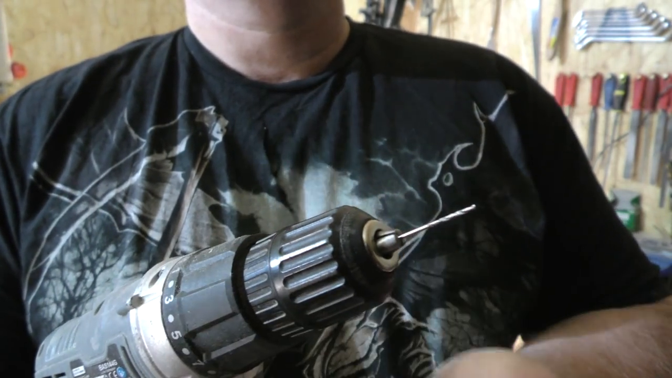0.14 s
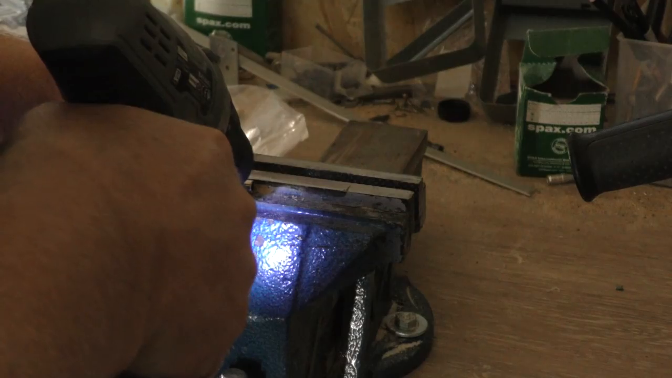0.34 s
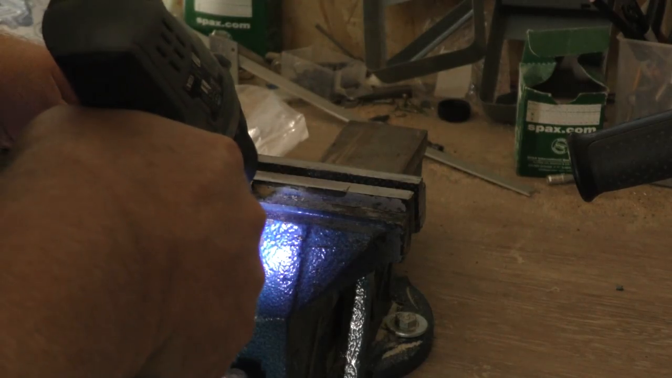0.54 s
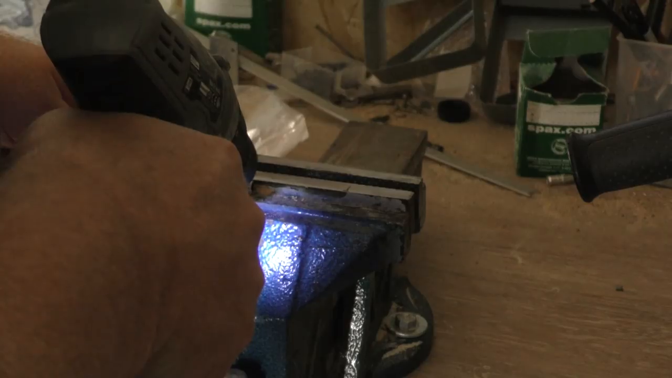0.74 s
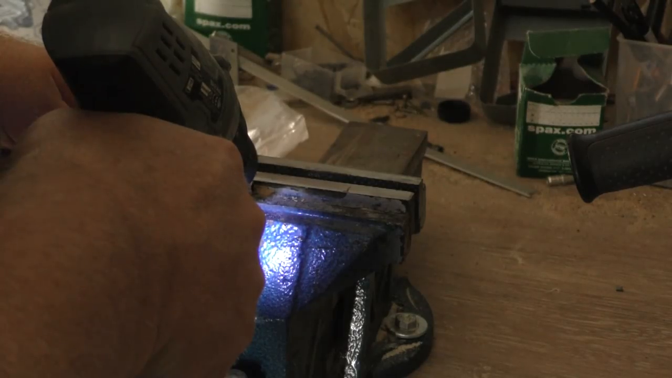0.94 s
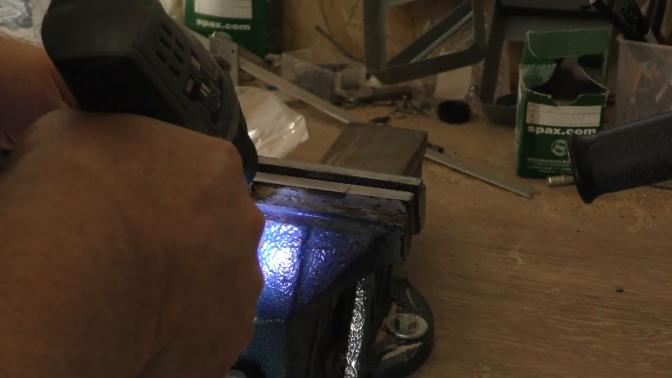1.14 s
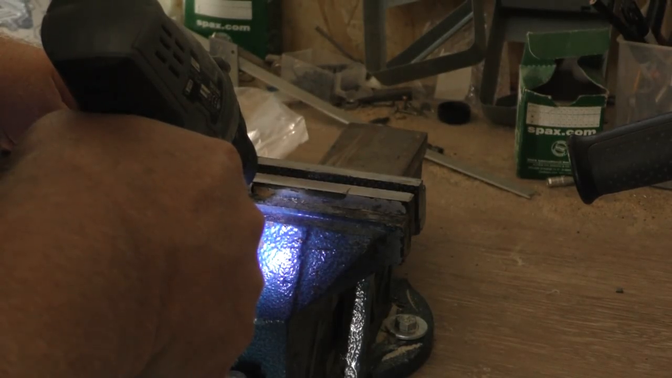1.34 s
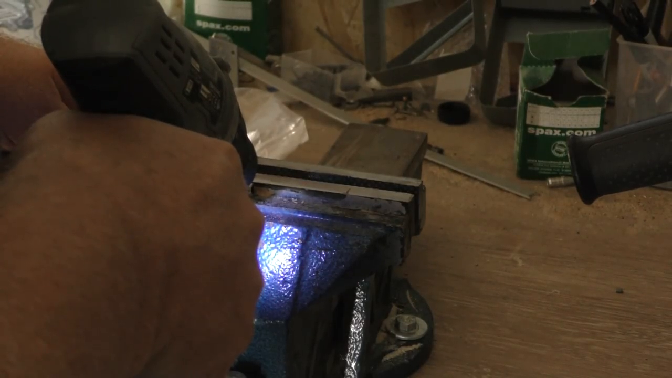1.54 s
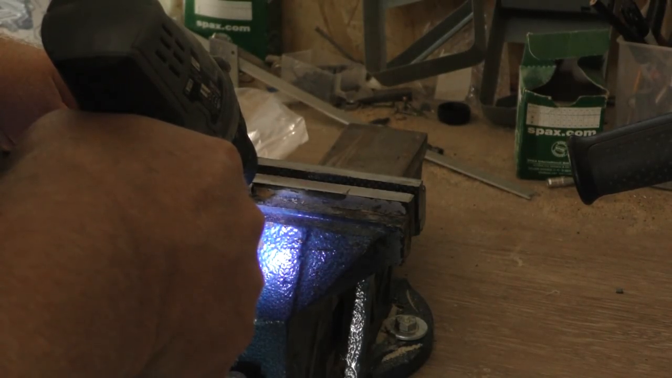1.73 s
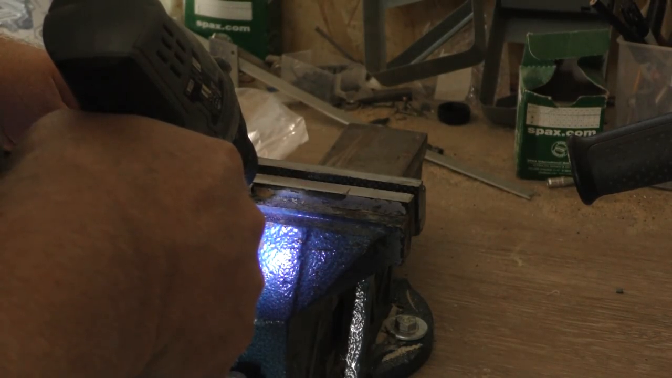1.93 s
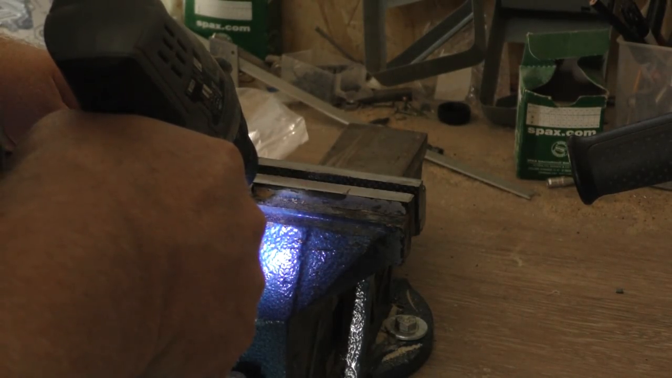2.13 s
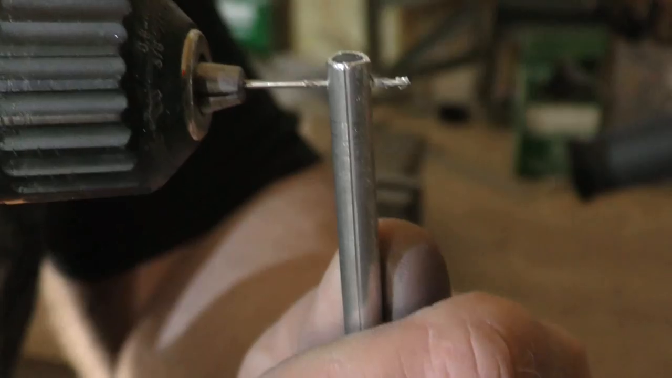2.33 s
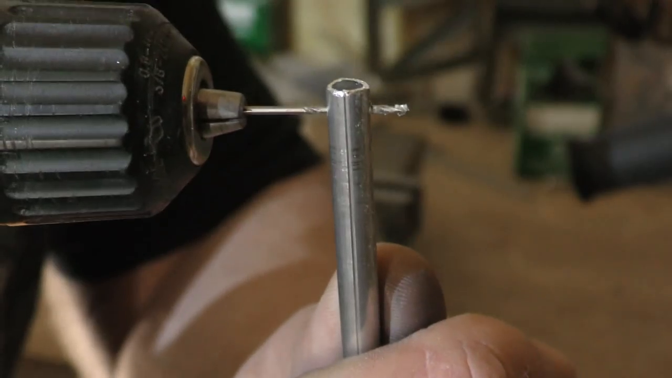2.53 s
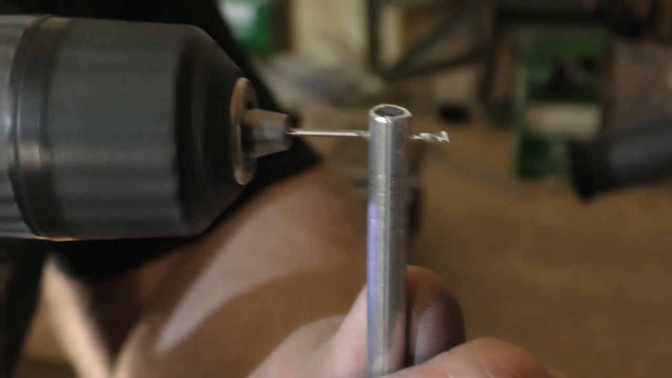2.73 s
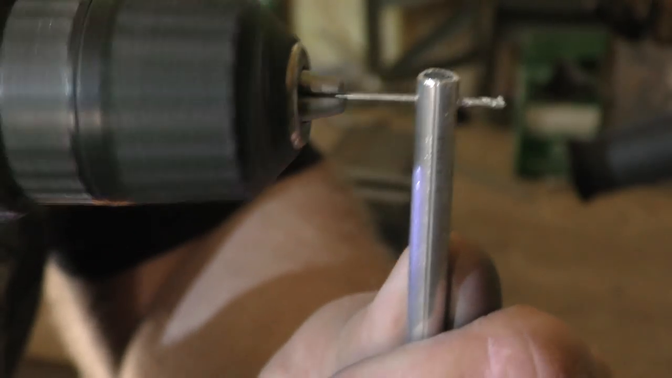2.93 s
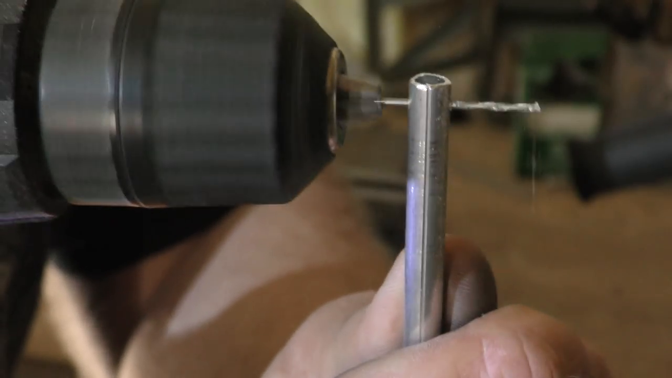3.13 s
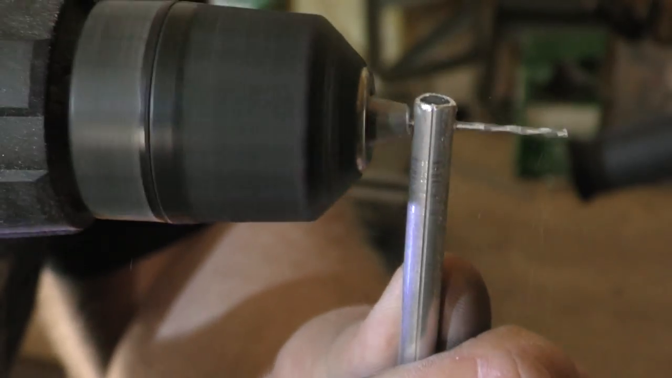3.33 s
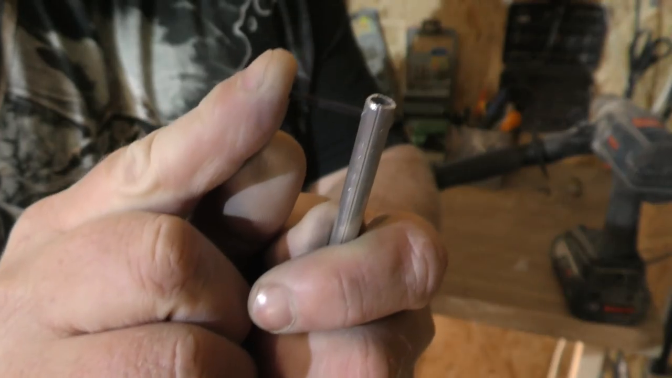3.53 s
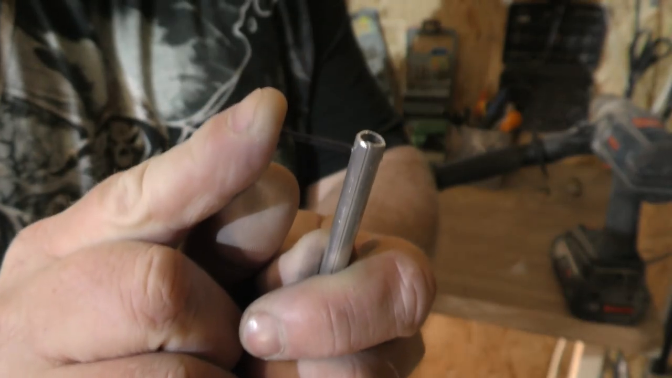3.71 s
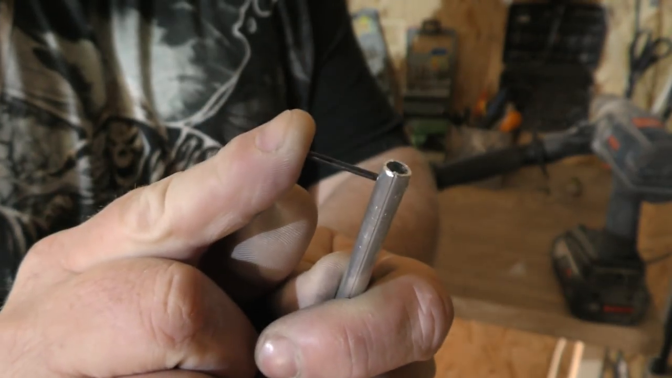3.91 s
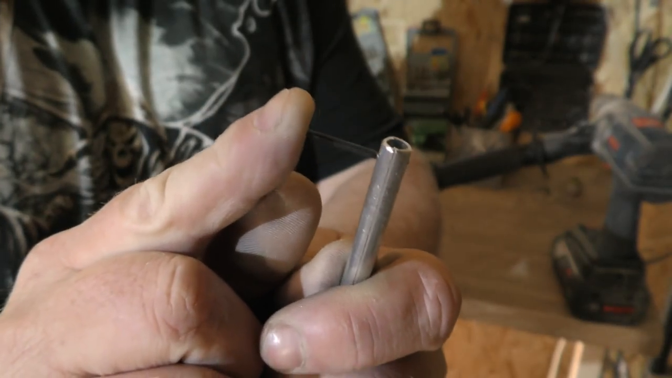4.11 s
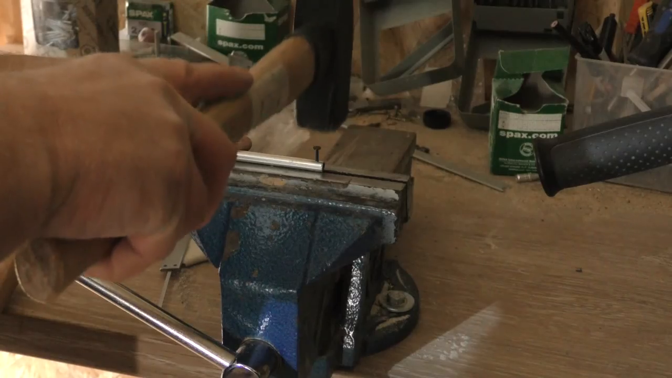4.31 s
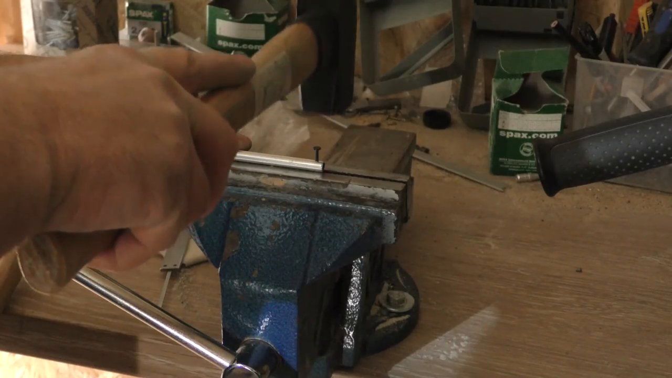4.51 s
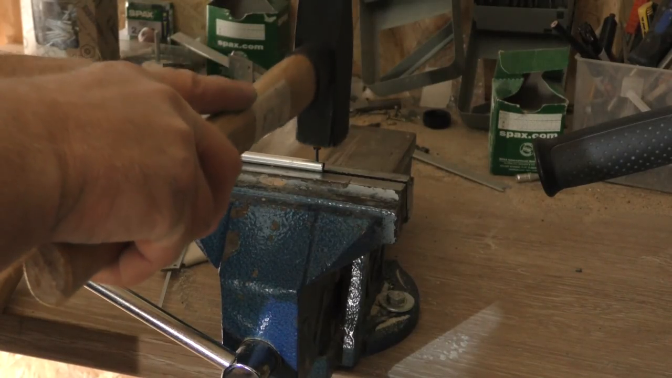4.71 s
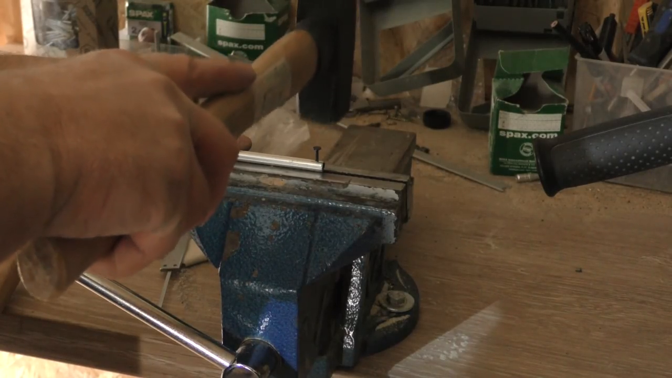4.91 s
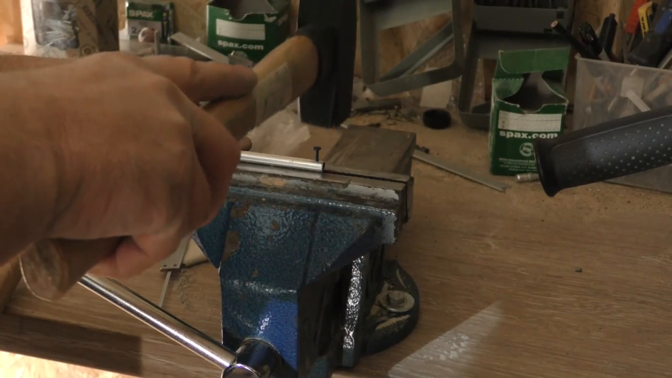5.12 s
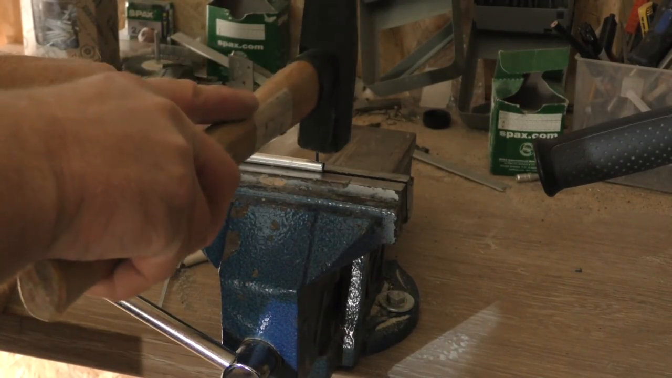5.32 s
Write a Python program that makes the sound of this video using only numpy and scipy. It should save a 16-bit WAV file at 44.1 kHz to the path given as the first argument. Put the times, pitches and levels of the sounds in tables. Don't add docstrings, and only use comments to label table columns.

```python
import sys
import numpy as np
from scipy import signal
from scipy.fft import rfft, irfft
from scipy.io import wavfile

SR = 44100
rng = np.random.default_rng(int(sys.argv[2]) if len(sys.argv) > 2 else 0)


def invert_db(x):
    u = np.asarray(x, float) / 20
    return 10 ** u


def dump_mix(stems):
    frames = np.atleast_2d(stems).T
    limited = np.clip(frames, -1, 1)
    pcm = np.round(limited * 32767).astype(np.int16)
    wavfile.write(sys.argv[1], SR, pcm)


N = 236331
TIME = np.arange(N) / SR
FFT_HZ = np.maximum(np.arange(N // 2 + 1) * SR / N, 1)
END_S = 6

SCENE_CHANGES = [
    0.3895,
    2.4087,
    3.4598,
    4.292,
]

# (air [dB], microphone hiss [dB], rumble [dB], air excess after the change [dB])
ROOM_LEVELS = [
    (-68, -67, -72.5, 3.5),
    (-61, -84, -84, 3),
    (-66.5, -94, -86.5, -16.5),
    (-70, -72.5, -71, 7),
    (-65, -69, -71.5, 1),
]
# (frequency [Hz], density [dB per Hz])
AIR_COLOUR = [(35, -30), (60, -16), (154, -13), (279, -10), (306, -11), (382, -4), (419, -10), (563, -8),
              (928, -14.5), (5000, -30.5), (6500, -47.5), (11000, -120)]
# (frequency [Hz], level [dB])
AIR_HUM = [(279.9, -78.5), (376.8, -99), (554.5, -80), (1949, -84), (2067, -86.5)]
# (frequency [Hz], level [dB])
CAMERA_WHINE = [(7957, -102), (11999, -94)]
# (frequency [Hz], side over mid [dB])
AIR_SIDE = [(60, -6), (110, -9), (200, -18), (360, -18), (660, -8.5), (1200, -2), (2180, -1.5), (3980, 3),
            (7240, 3), (13200, 1)]
# (frequency [Hz], density [dB per Hz])
FADING = [(120, -43), (200, -15), (338, -1), (402, -15), (479, -6), (560, -22), (754, -5), (1810, 5),
          (13000, -26)]
FADING_DB, FADING_T60_S = -61.5, 0.6
# (start [s], end [s], hiss lift [dB])
RUSTLES = [
    (2.56, 2.624, 12),
    (4.22, 4.292, 6.5),
]
SETTLE_S = 0.37

# (start [s], end [s], start pitch [Hz], end pitch [Hz], level [dB])
SQUEAKS = [
    (2.804, 2.875, 4980, 5330, -45),
    (3.54, 3.62, 4720, 4700, -79),
    (4.31, 4.345, 10450, 10750, -79),
    (4.345, 4.41, 10400, 10250, -84),
    (4.62, 4.72, 9800, 8800, -82),
]

# (time [s], peak [dB], bench thump [dB], vice clang [dB], crack [dB])
BLOWS = [
    (4.293, -20.5, -19.5, -19.5, -24),
    (4.423, -3, -17.5, -14.5, -13.5),
    (4.748, -3, -23, -14, -21.5),
    (5.047, -3, -18.5, -11.5, -16),
    (5.328, -6, -14.5, -11, -12.5),
]
# (frequency [Hz], level [dB], decay T60 [s])
KNOCK = [(93.6, -9.5, 0.3), (203.3, -4.5, 0.44), (379.4, -2.5, 0.13), (423, -3, 0.15), (508, -8, 0.13),
         (590, -22, 0.12), (763, -10, 0.064), (880, -3, 0.18), (1300, -37, .06), (1491, 1.5, 0.086),
         (1910, -10.5, 0.46), (2260, -11, 0.61), (2330, -7.5, 0.3), (2690, 2, 0.063)]
# (frequency [Hz], level [dB], decay T60 [s])
VICE = [(371, -10, 0.83), (425, -1, 0.52), (484, -4, 0.42), (829, -9, 0.45), (931, -5, 0.26),
        (1028, -5, 0.28), (1303, -7, 0.43), (1405, -11, 0.49), (1814, -8, 0.22), (1911, -9, 0.48),
        (2164, -10, 0.51), (2229, -16, 0.9), (2299, -5, 0.29), (3510, -16, 0.32)]
# (frequency [Hz], density [dB per Hz])
CRACK = [(35, -54), (60, -91), (262, -8), (423, 4.5), (622, -10.5), (1510, -3), (1690, -4.5), (2370, -12),
         (3340, -13), (7900, -19), (13600, -33.5)]
# (frequency [Hz], density [dB per Hz])
TAIL = [(24, -48), (40, -7.5), (200, -3), (268, -8.5), (494, -4.5), (1050, -15.5), (1160, -12),
        (1440, -12.5), (1700, -18), (2300, -11), (2790, -23), (5260, -21.5), (13600, -41)]
# (frequency [Hz], decay T60 [s])
TAIL_T60 = [(50, 1), (100, 0.25), (200, 0.49), (500, 0.46), (1500, 0.48), (4000, 0.41), (8000, 0.29),
            (13000, 0.18)]
# (frequency [Hz], side over mid [dB])
BLOW_SIDE = [(60, -27), (110, -36), (200, -47), (360, -38), (660, -25.5), (1200, -19), (2180, -9),
             (3980, -9), (7240, -3.5), (13200, 0.5)]
# (frequency [Hz], left over right [dB])
BLOW_LEAN = [(60, 0.46), (120, 3), (230, -1.8), (450, 1.2), (890, 0.36), (1740, -0.5), (3420, -0.5),
             (6720, -1), (13200, 1.9)]
KNOCK_DB, RING_DB = -10.5, -29.5
STALE_DB = -5
BOUNCE_S, BOUNCE_DB = .0074, -6
LEAD_S = 0.0031
SAME_PATH = .4

# (frequency [Hz], density [dB per Hz])
STEADY_WHIR = [(29, -59), (50, -58), (144, -24), (252, -16), (297, -24), (342, -18), (443, -9.5),
               (510, -13.5), (587, -1), (709, -5), (1030, -5), (1770, -3), (2350, -5), (9150, -11.5),
               (13600, -22.5)]
# (frequency [Hz], width [Hz], level [dB])
STEADY_CASING = [(150, 16, 2), (460, 92, 6), (573, 96, 4.5), (1030, 79, 8.5), (1523, 83, 7),
                 (1938, 206, 5.5), (4710, 380, 5), (5800, 850, 4), (9930, 440, 4), (11600, 130, -8.5),
                 (11740, 130, 7.5)]
# (order [turns], level [dB])
STRONG_ORDERS = [(.5, -71), (2, -53), (3, -57), (3.49, -55), (6, -54), (7.5, -60), (8.5, -62), (12, -56),
                 (12.5, -64), (19, -60), (24, -64), (26, -64), (30, -59), (42, -70), (43, -74), (44, -74)]
# (frequency [Hz], level [dB])
GEAR_TONES = [(457.6, -63), (1583, -56), (1954, -58), (4011, -66), (4344, -66), (6665, -66)]
# (frequency [Hz], side over mid [dB])
STEADY_SIDE = [(60, -14), (110, -20), (200, -37), (360, -34), (660, -30), (1200, -28), (2180, -18.5),
               (3980, -12.5), (7240, -3), (13200, 1.5)]
# (frequency [Hz], left over right [dB])
STEADY_LEAN = [(60, 16), (120, 1), (230, -1), (450, 8), (890, -7), (1740, 0), (3420, 0.5), (6720, -3.5),
               (13200, 5)]
STEADY_TURNS_HZ, STEADY_DB = 297.6, -36.5
ORDER_DB, ORDER_FALL_DB, TOP_ORDERS_DB = -64.5, .15, -8

# (frequency [Hz], density [dB per Hz])
CLOSE_WHIR = [(29, -72), (50, -39), (122, -60), (182, -35), (247, -33), (297, -36), (367, -11), (726, -9.5),
              (816, -10), (1900, -10.5), (3410, -12), (4970, -7.5), (6280, -13.5), (10800, -18.5),
              (13600, -33)]
# (frequency [Hz], width [Hz], level [dB])
CLOSE_CASING = [(494, 170, 2.5), (700, 64, 7.5), (1050, 130, 4), (1520, 110, 5), (1884, 230, 10.5),
                (2230, 55, 5), (2730, 220, 6), (5070, 620, 2.5)]
# (time [s], turns [Hz])
ROTOR = [(2.72, 124.5), (2.83, 152.4), (2.89, 165.5), (3.0, 173.8), (3.19, 183.5), (3.355, 188.8),
         (3.375, 233), (3.403, 246.6), (3.461, 279.5)]
# (order [whine pitch], level [dB])
WHINE_ORDERS = [(1, 0), (2, -9), (3, -21)]
# (time [s], level [dB], frequency [Hz], decay T60 [s])
TRIGGER_CLICKS = [
    (2.602, -66, 5600, .003),
    (2.6165, -47, 1500, .012),
    (2.617, -48, 520, .03),
    (2.64, -48, 2600, .005),
    (2.651, -50, 1700, .03),
    (2.655, -41, 5200, .009),
]
# (order [turns], level at 180 turns [dB], rise per doubling of speed [dB])
CLOSE_ORDERS = [(1, -69.5, 32), (2, -72.5, 23), (3, -47.5, 10.5), (4, -46.5, 4), (6, -49.5, 8)]
# (frequency [Hz], width [Hz], level [dB])
TONE_PATH = [(516, 7.3, -4), (724, 27, 9), (787, 75, -12), (1030, 160, -13)]
# (order [turns], level [dB])
MESH = [(27, -47), (42, -59.5)]
# (frequency [Hz], side over mid [dB])
CLOSE_SIDE = [(60, 0), (110, -24), (200, -34), (360, -29), (660, -30), (1200, -24), (2180, -8.5),
              (3980, -15), (7240, 0), (13200, 6)]
# (frequency [Hz], left over right [dB])
CLOSE_LEAN = [(60, 8), (120, 0.0), (230, -1), (450, 0.5), (890, 7), (1740, 3.5), (3420, 3.5), (6720, 0.5),
              (13200, 4)]
PRESS_S, SPIN_S, FREE_S = 2.6165, 2.64, 3.36
CLOSE_DB, SPIN_GAP_DB, SPIN_UP_S = -42, 35, 0.037
JOLT_DB, JOLT_T60_S = -65, 0.12
FREE_RISE_DB_PER_S = 40
DULL_DB, DULL_UNTIL_S, DULL_RAMP_S = -10, 2.754, .08
RATTLE_PER_S, RATTLE_DB, RATTLE_UNTIL_S = 350, 13.5, 2.73
MESH_FROM_S, MESH_TO_S, MESH_GROWS_DB_PER_S = 2.99, 3.335, 13
WHINE_STALL_HZ, WHINE_SLIP_HZ, WHINE_RUN_HZ = 3780, 3630, 3515
WHINE_SAG_S, WHINE_DB = .015, -58.5
SNAG_WOBBLE, SNAG_S, SNAG_DB = .05, .07, 4


def rms_one(x):
    return x / np.sqrt(np.mean(x ** 2) + 1e-20)


def in_time(rows):
    s, *columns = np.transpose(rows)
    return [np.interp(TIME, s, c) for c in columns]


def at_hz(points, hz):
    table_hz, values = np.transpose(points)
    return np.interp(np.log(hz), np.log(table_hz), values)


def through(resonances, hz):
    return sum(db / (1 + (2 * (hz - centre_hz) / width_hz) ** 2) for centre_hz, width_hz, db in resonances)


def between(start, end, edge=.0008):
    return np.clip(np.minimum(TIME - start, end - TIME) / edge + .5, 0, 1)


def drift(rate):
    r = np.exp(-80 * np.pi * rate / SR)
    slow = signal.lfilter([1], [1, -2 * r, r * r], rng.standard_normal(N // 40 + 2002))[2000:]
    return np.interp(np.arange(N) / 40, np.arange(len(slow)), rms_one(slow))


def coloured(spectrum, resonances=()):
    level_db = at_hz(spectrum, FFT_HZ) + through(resonances, FFT_HZ)
    return rms_one(irfft(rfft(rng.standard_normal(N)) * invert_db(level_db), N))


def sine(hz):
    return np.sqrt(2) * np.sin(2 * np.pi * (np.cumsum(hz) / SR + rng.random()))


def ring(clicks, hz, t60):
    r, w = invert_db(-60 / (t60 * SR)), 2 * np.pi * hz / SR
    return signal.lfilter([0, np.sin(w)], [1, -2 * r * np.cos(w), r * r], clicks + 1e-18)


def highpass(x, order, hz):
    return signal.sosfilt(signal.butter(order, hz, "high", fs=SR, output="sos"), x)


def pair(x, side, lean, spread_s=0.017):
    scatter = rng.standard_normal(2000) * np.exp(-np.arange(2000) / (spread_s * SR))
    width = invert_db(at_hz(side, FFT_HZ))
    tilt = np.tanh(at_hz(lean, FFT_HZ) * np.log(10) / 20)
    in_step = np.clip(tilt * (1 + width ** 2) / (2 * width), -1, 1)
    apart = in_step + np.sqrt(1 - in_step ** 2) * rfft(scatter / np.linalg.norm(scatter), N)
    difference = irfft(rfft(x) * width * apart, N)
    return np.array([x + difference, x - difference])


def room_air():
    to_vice, to_close, to_room, _ = SCENE_CHANGES
    place = np.searchsorted(SCENE_CHANGES, TIME)
    air_db, hiss_db, rumble_db, excess_db = np.array(ROOM_LEVELS)[place].T
    since_change = TIME - np.array([0, *SCENE_CHANGES])[place]
    air_db = air_db + excess_db * np.exp(-since_change / SETTLE_S)
    rustle_db = sum(db * between(a, b, edge=0.047) for a, b, db in RUSTLES)
    hiss_db = hiss_db + rustle_db + 2.4 * drift(7.1)
    air = coloured(AIR_COLOUR) * invert_db(air_db + 0.37 * drift(6.4))
    air += coloured(FADING) * invert_db(FADING_DB - 60 * TIME / FADING_T60_S)
    hum = sum(invert_db(db + 1.28 * drift(7.4)) * sine(np.full(N, hz)) for hz, db in AIR_HUM)
    hum = hum * between(to_room, END_S)
    hiss = invert_db(hiss_db - 4.0) * np.array([coloured([(1500, -2.0), (5000, 2), (14000, -5.0)]) for ear in "LR"])
    rumble = np.array([coloured([(8, 1.0), (40, -13.5), (120, -40.5)]) for ear in "LR"])
    rumble = rumble * invert_db(rumble_db + 9.5)
    whine = sum(invert_db(db) * sine(np.full(N, hz)) for hz, db in CAMERA_WHINE)
    ducked = invert_db(-14 * between(to_vice, to_close) - 3.6 * between(3.1, to_room))
    wide_air = pair(air + hum, AIR_SIDE, [(1, 0.0043)], spread_s=0.023)
    return (wide_air + hiss + rumble * ducked ** .6) * ducked + whine


def squeaks():
    out = np.zeros(N)
    for start, end, from_hz, to_hz, db in SQUEAKS:
        glide_hz = np.interp(TIME, [start, end], [from_hz, to_hz])
        out += invert_db(db) * between(start, end, edge=.01) * sine(glide_hz)
    return out


def blow_db(hz, fresh=False):
    levels_db = []
    for _, peak_db, thump_db, clang_db, crack_db in BLOWS:
        balance = [(150, thump_db), (450, KNOCK_DB), (1700, clang_db), (6000, crack_db)]
        levels_db.append(peak_db + at_hz(balance, hz))
    levels_db = np.array(levels_db)
    levels_db[0] += STALE_DB * fresh
    return levels_db


def after_blows(levels_db, t60, rise_s):
    clicks, at = np.zeros(N), np.array(BLOWS)[:, 0] - LEAD_S
    clicks[(at * SR).astype(int)] = invert_db(levels_db)
    clicks[((at + BOUNCE_S) * SR).astype(int)] = invert_db(levels_db + BOUNCE_DB)
    r, soft = invert_db(-60 / (t60 * SR)), np.exp(-1 / (rise_s * SR))
    return signal.lfilter([1 - soft], np.convolve([1, -r], [1, -soft]), clicks + 1e-18)


def struck(modes, level_db, contacts, push_s, scatter_db, damping, fresh):
    out = np.zeros(N)
    for k, (hz, db, t60) in enumerate(modes):
        strength_db = blow_db(hz, fresh) + db + level_db + scatter_db * rng.standard_normal(len(BLOWS))
        push = contacts * after_blows(strength_db, *push_s)
        out += (-1) ** k * ring(push, hz, damping * t60)
    return out


def dying_noise(crack_db, crack_t60, tail_db):
    out, white = np.zeros(N), rng.standard_normal((2, N))
    edges = 64 * 2 ** np.arange(0, 8, 1 / 3)
    sample = np.arange(N)
    starts = ((np.array(BLOWS)[:, 0] - LEAD_S) * SR).astype(int)
    since = sample - starts[np.maximum(np.searchsorted(starts, sample, "right") - 1, 0)]
    white = np.sqrt(SAME_PATH) * white[:, since] + np.sqrt(1 - SAME_PATH) * white
    for k, (low, high) in enumerate(zip(edges, edges[1:])):
        hz = np.sqrt(low * high)
        band = signal.sosfilt(signal.butter(3, [low, high], "band", fs=SR, output="sos"), white[k % 2])
        contact_db = blow_db(hz, True) + at_hz(CRACK, hz) + crack_db
        crack = after_blows(contact_db, crack_t60 + 12 / hz, 0.00048 + 2.4 / hz)
        room_db = blow_db(hz) + at_hz(TAIL, hz) + tail_db
        tail = after_blows(room_db, at_hz(TAIL_T60, hz), 0.015 + 0.75 / hz)
        out += band * (crack + tail)
    return out


def hammer():
    knock = struck(KNOCK, level_db=-12, contacts=0.72, push_s=(.0006, .0001), scatter_db=2.5, damping=0.95,
                   fresh=True)
    knock = np.roll(knock, round(LEAD_S * SR))
    rattle = rng.standard_normal(N) * (rng.random(N) < 1500 / SR)
    rings = struck(VICE, level_db=RING_DB, contacts=rattle, push_s=(.3, .004), scatter_db=1.5, damping=.5,
                   fresh=False)
    blows = knock + rings + dying_noise(crack_db=15.5, crack_t60=0.03, tail_db=7.0)
    blows = highpass(blows, 4, 68)
    return pair(blows, BLOW_SIDE, BLOW_LEAN, spread_s=0.0085) * between(SCENE_CHANGES[3], END_S)


def whir(spectrum, casing, turns, gating, flutter_db):
    throb = sum(np.cos(2 * np.pi * k * turns) for k in (1, 2, 4))
    return coloured(spectrum, casing) * (1 + gating * throb) * invert_db(flutter_db * drift(27.0))


def drill_at_vice():
    hunt = 1 + 0.000794 * drift(3.37)
    turns = np.cumsum(STEADY_TURNS_HZ * hunt) / SR
    noise = invert_db(STEADY_DB - 1.5) * whir(STEADY_WHIR, STEADY_CASING, turns, gating=0.05, flutter_db=0.6)
    orders = {k: ORDER_DB - ORDER_FALL_DB * k + TOP_ORDERS_DB * (k > 34) for k in range(1, 46)}
    orders.update(dict(STRONG_ORDERS))
    lines = [(k * STEADY_TURNS_HZ, db) for k, db in orders.items()] + list(GEAR_TONES)
    tones = sum(invert_db(db - .8 + 2.5 * drift(16)) * sine(hz * hunt) for hz, db in lines)
    return pair(noise + tones, STEADY_SIDE, STEADY_LEAN) * between(SCENE_CHANGES[0], SCENE_CHANGES[1])


def close_whir(turns_hz, spun):
    swell_db = CLOSE_DB - SPIN_GAP_DB * np.exp(-spun / SPIN_UP_S)
    level = invert_db(swell_db + FREE_RISE_DB_PER_S * np.clip(TIME - FREE_S, 0, 1))
    level += invert_db(JOLT_DB - 60 * np.maximum(TIME - PRESS_S, 0) / JOLT_T60_S)
    turns = np.cumsum(turns_hz) / SR
    noise = level * invert_db(5.5) * whir(CLOSE_WHIR, CLOSE_CASING, turns, gating=0.041, flutter_db=0.5)
    teeth = (rng.random(N) < RATTLE_PER_S / SR) * between(SPIN_S, RATTLE_UNTIL_S, edge=0.12)
    knocks = noise * invert_db(RATTLE_DB - 7) * signal.lfilter([1], [1, -.975], teeth)
    noise = noise + highpass(knocks, 3, 350)
    bass = signal.sosfilt(signal.butter(1, 3000, fs=SR, output="sos"), noise)
    return bass + (noise - bass) * invert_db(DULL_DB * between(0, DULL_UNTIL_S, edge=DULL_RAMP_S))


def rotor_tones(turns_hz):
    free = between(FREE_S, END_S, edge=0.0079)
    fades_db = SNAG_DB * free - 14 * between(FREE_S + SNAG_S, END_S, edge=0.027)
    out = np.zeros(N)
    for k, db, rise_db in CLOSE_ORDERS:
        snags = k > 1
        level_db = db + rise_db * np.log2(turns_hz / 180) + through(TONE_PATH, k * turns_hz)
        level_db = level_db + 1.14 * drift(9.2) + snags * fades_db
        out += invert_db(level_db) * sine(k * turns_hz * (1 + snags * SNAG_WOBBLE * free * drift(65)))
    return out


def gear_mesh(turns_hz):
    grows_db = MESH_GROWS_DB_PER_S * np.clip(TIME - MESH_FROM_S, 0, 1)
    return sum(invert_db(db + grows_db + 2.2 * drift(12)) * sine(k * turns_hz) for k, db in MESH)


def speed_control_whine(spun):
    sag_hz = (WHINE_SLIP_HZ - WHINE_RUN_HZ) * np.exp(-spun / WHINE_SAG_S)
    whine_hz = np.where(TIME < SPIN_S, WHINE_STALL_HZ, WHINE_RUN_HZ + sag_hz)
    whine = sum(invert_db(WHINE_DB + 30 * spun + db + 1.5 * drift(40)) * sine(k * whine_hz * (1 + .003 * drift(60)))
                for k, db in WHINE_ORDERS)
    return whine * between(PRESS_S, 2.83, edge=.004)


def trigger_clicks():
    clicks = np.zeros(N)
    for s, db, hz, t60 in TRIGGER_CLICKS:
        tick = np.zeros(N)
        tick[round(s * SR)] = invert_db(db)
        clicks += ring(tick, hz, t60) + 2.5 * tick
    return highpass(clicks, 3, 350)


def drill_close():
    to_close, to_room = SCENE_CHANGES[1], SCENE_CHANGES[2]
    turns_hz, = in_time(ROTOR)
    spun = np.maximum(TIME - SPIN_S, 0)
    drill = close_whir(turns_hz, spun) * between(PRESS_S, to_room)
    drill += rotor_tones(turns_hz) * between(2.72, to_room, edge=0.11) ** .5
    drill += speed_control_whine(spun) + trigger_clicks()
    drill += gear_mesh(turns_hz) * between(MESH_FROM_S, MESH_TO_S, edge=.02)
    return pair(drill, CLOSE_SIDE, CLOSE_LEAN) * between(to_close, to_room)


def scene():
    return room_air() + squeaks() + hammer() + drill_at_vice() + drill_close()


def low_pass(x):
    return signal.sosfilt(signal.butter(12, 13780, fs=SR, output="sos"), x)


def record(dry):
    rounded = 0.83 * np.tanh(dry / 0.77)
    top_cut = signal.cheby2(10, 50, 13300 * 1.105, fs=SR, output="sos")
    mix = signal.sosfilt(top_cut, rounded)
    return low_pass(mix)


dry = scene()
out = record(dry)
dump_mix(out)
```